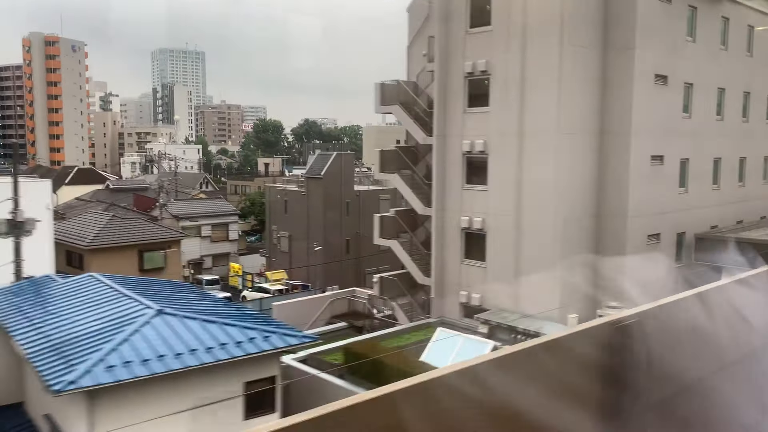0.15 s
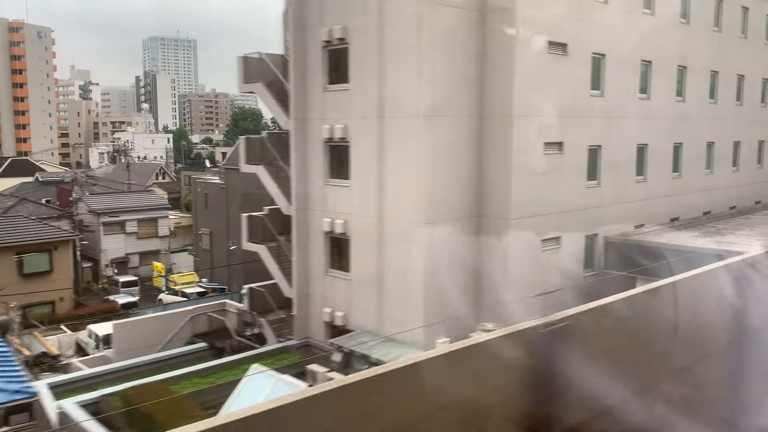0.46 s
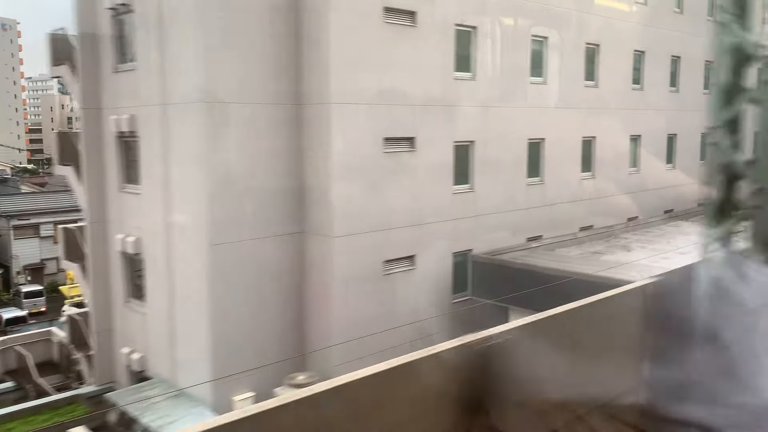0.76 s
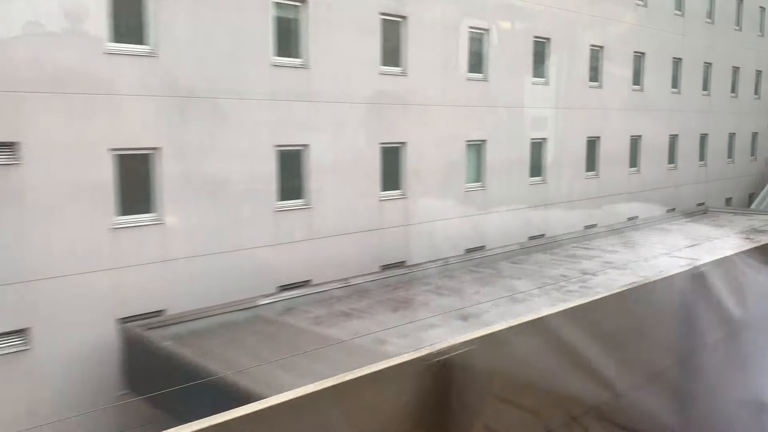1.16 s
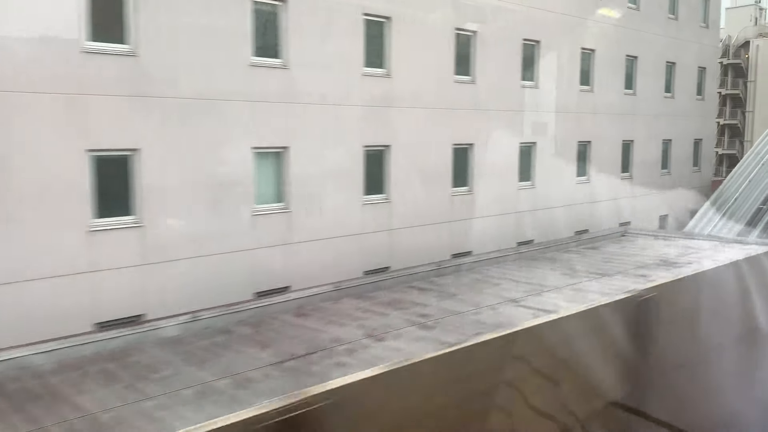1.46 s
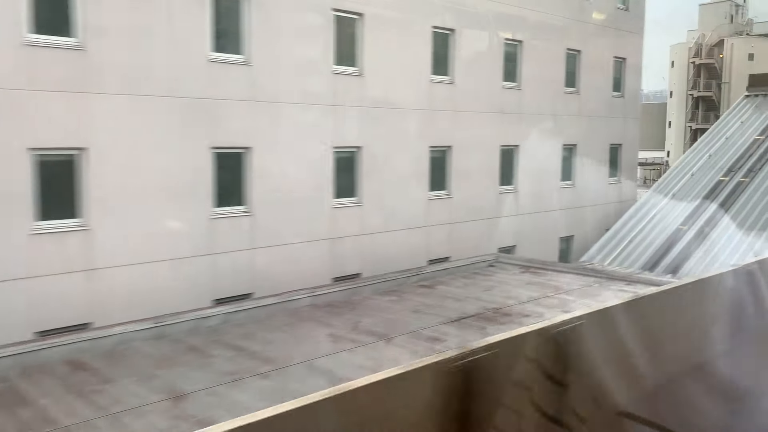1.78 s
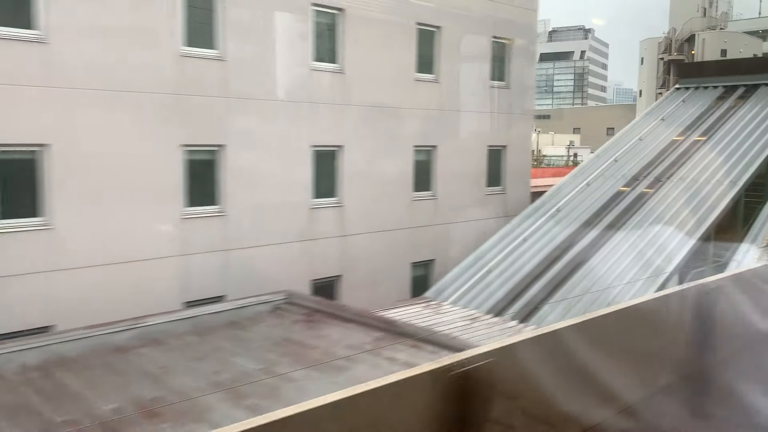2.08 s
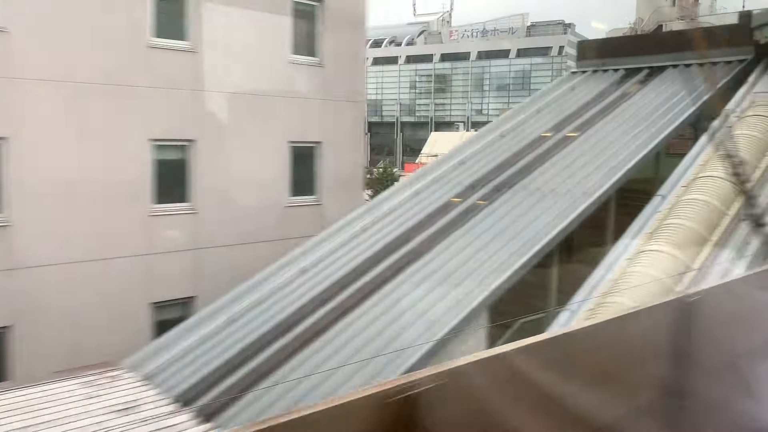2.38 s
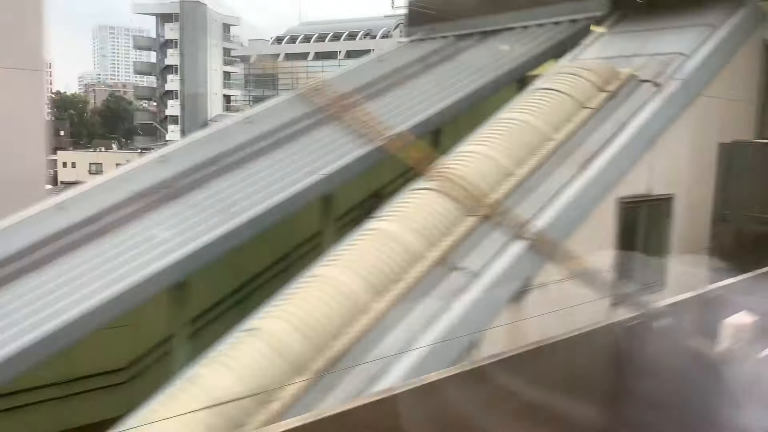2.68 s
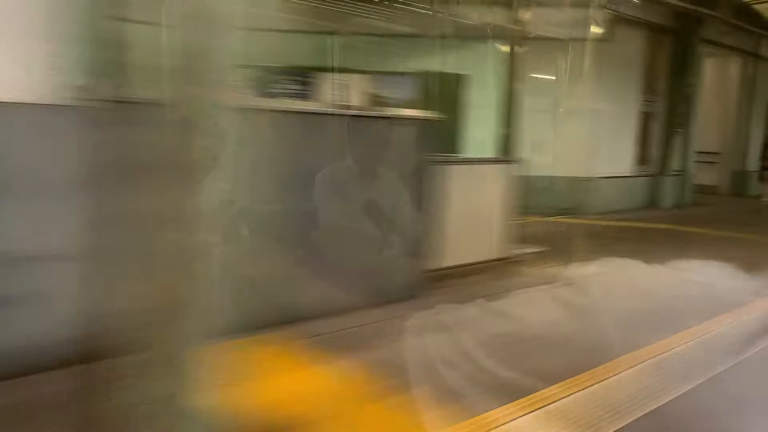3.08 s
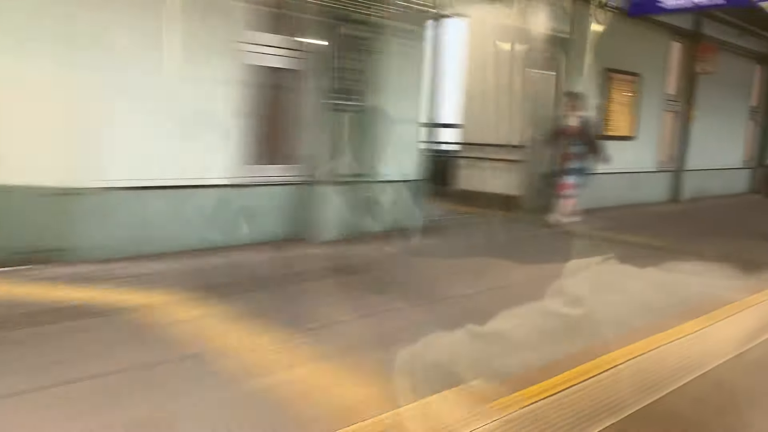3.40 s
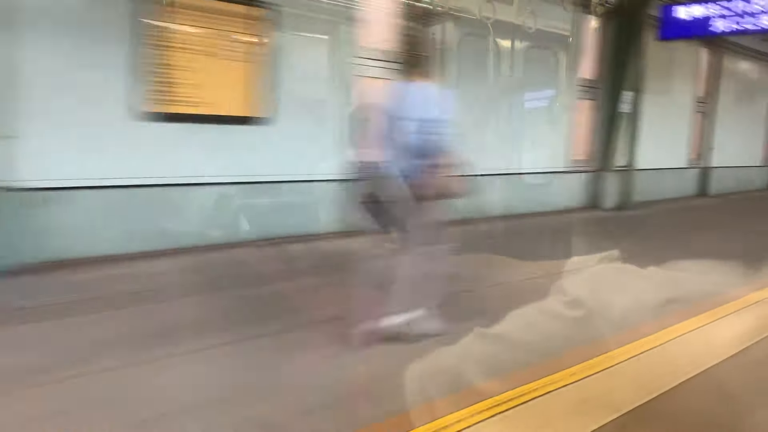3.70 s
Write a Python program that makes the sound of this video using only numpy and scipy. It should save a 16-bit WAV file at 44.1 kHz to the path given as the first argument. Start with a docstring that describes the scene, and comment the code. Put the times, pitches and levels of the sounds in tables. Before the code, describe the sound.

Low roaring train rumble with floor thuds and hollow knocks, heard from inside a moving carriage.

```python
"""A booming, roaring railway carriage rolls along a viaduct into a station: two spaced microphones at the window.
Boom, rumble, roar and treble are patchy noise lifted at the carriage's resonances, louder under the station roof.
Narrow hums, thuds, knocks and a faint wheel squeal come from below, as noise bands and wavering sines;
a tone stands across the carriage. Close by, cloth brushes in short strokes of hiss and a few small things
tick as decaying noise."""
import sys
import numpy as np
from scipy import signal
from scipy.fft import rfft, irfft, next_fast_len
from scipy.io import wavfile
from scipy.ndimage import uniform_filter1d, map_coordinates

SR = 44100
rng = np.random.default_rng(int(sys.argv[2]) if len(sys.argv) > 2 else 0)


def master_out(mix):
    """Clip the mix to full scale and print it as 16-bit PCM to the path in sys.argv[1]."""
    frames = np.transpose(np.atleast_2d(mix))
    ceiling = np.clip(frames, -1, 1)
    pcm = np.round(ceiling * 32767).astype(np.int16)
    wavfile.write(sys.argv[1], SR, pcm)


N = 169785

# Swell of the wheel noise before jolts: (time [s], roar [dB], treble [dB], rail hiss [dB])
ROAR_SWELL = [(0, -33.5, -39.5, -64), (.2, -36, -40.5, -63), (.45, -33.5, -38, -62), (.55, -31, -36, -61),
              (.68, -29.5, -33, -55), (.74, -35.5, -36.5, -55.5), (.85, -33.5, -38.5, -57),
              (.92, -31, -37.5, -57), (.97, -34.5, -39.5, -53), (1.15, -33, -38.5, -61),
              (1.42, -33.5, -40.5, -58), (1.8, -35, -38.5, -57.5), (2.1, -33, -38.5, -58.5),
              (2.4, -30.5, -38.5, -58), (2.8, -26.5, -37.5, -57.5), (3.15, -24, -35, -58),
              (3.45, -26, -36.5, -59), (3.83, -25, -34, -57)]
# Train sound at the spaced microphones: (frequency [Hz], likeness [0-1], lead of the right one [rad])
MICROPHONE_PAIR = [(30, .985, 0), (90, .98, 0), (200, .92, -.05), (330, .88, .2), (460, .5, 1.1),
                   (650, .45, 3), (900, .1, 3), (1800, .25, 1.5), (2400, .25, 3.3), (3000, .2, 4.7),
                   (4300, .3, 6.3), (5600, .3, 9.4), (7500, .7, 12.5), (9000, .7, 14)]


def amp(db):
    """Decibels to gain."""
    return 10 ** (np.asarray(db) / 20)


def unit(x):
    """Scaled to rms 1."""
    return x / np.sqrt(np.mean(x ** 2) + 1e-20)


def along(points, hz):
    """Each column after the frequency, read on a log frequency axis."""
    f, *cols = np.transpose(points)
    return [np.interp(np.log(hz + 1), np.log(f + 1), c) for c in cols]


def curves(rows):
    """One value per sample for each column after the time."""
    s, *cols = np.transpose(rows)
    return [np.interp(np.arange(N) / SR, s, c) for c in cols]


def wobble(rate):
    """A smooth random curve, rate knots a second."""
    knots = rng.standard_normal(int(N * rate / SR) + 4)
    return map_coordinates(knots, [np.arange(N) * rate / SR])


def filtered(x, response, mirror="even"):
    """x times a complex response of frequency; mirrored ends keep the edges smooth."""
    edge = SR // 8
    x = np.pad(x, [(0, 0)] * (x.ndim - 1) + [(edge, edge)], mode="reflect", reflect_type=mirror)
    m = next_fast_len(N + 2 * edge)
    spectrum = rfft(x, m) * response(np.fft.rfftfreq(m, 1 / SR))
    return irfft(spectrum, m)[..., edge:edge + N]


def spread(pair, gain, arrival):
    """Two unrelated signals made into left and right; arrival(hz) gives likeness and right's lead."""
    def mid_side_gain(hz):
        turn = np.arccos(np.clip(arrival(hz)[0], 0, 1)) / 2
        return gain(hz) * [np.cos(turn), np.sin(turn)]

    def lead(hz):
        return np.exp(.5j * np.outer([-1, 1], arrival(hz)[1]))

    mid, side = filtered(pair, mid_side_gain)
    return filtered(np.array([mid + side, mid - side]), lead)


def from_train(hz):
    """Likeness and lead of the train's sound at the two microphones."""
    return along(MICROPHONE_PAIR, hz)


def from_nearby(hz):
    """A close source reaches the left microphone a little later, in step at one frequency."""
    likeness, lag_s, in_step_hz = .87, 1.62e-4, 7450
    return likeness + 0 * hz, 2 * np.pi * lag_s * (hz - in_step_hz)


def peak(hz, centre_hz, width_hz):
    """Gain of one resonance."""
    return 1 / (1 + (2 * (hz - centre_hz) / width_hz) ** 2)


def resonant_noise(hz, width_hz):
    """Noise of rms 1 through one resonance, spread like the train's sound."""
    return unit(spread(rng.standard_normal((2, N)), lambda f: peak(f, hz, width_hz), from_train))


def patchy_noise(patchy_db):
    """Two noises sharing patches of random gain in time and frequency."""
    z = signal.stft(rng.standard_normal((2, N)), nperseg=512)[2]
    field = uniform_filter1d(rng.standard_normal(z.shape[1:]), 5, 0)
    field = uniform_filter1d(field, 12, 1)
    return signal.istft(z * amp(patchy_db * unit(field)), nperseg=512)[1][:, :N]


def through_carriage(colour, patchy_db):
    """Rolling noise of rms 1, lifted at the carriage's resonances."""
    # Resonances over the broad colour: (frequency [Hz], width [Hz], lift [dB])
    resonances = [(153, 12, 3), (303, 22, 4), (393, 16, 6), (700, 25, 6), (760, 30, 4), (1370, 50, 2),
                  (1950, 150, 2), (2750, 150, 2)]

    def gain(hz):
        lift = 1 + sum((amp(db) - 1) * peak(hz, centre, width) for centre, width, db in resonances)
        return amp(along(colour, hz)[0]) * lift
    return unit(spread(patchy_noise(patchy_db), gain, from_train))


def rolling():
    """Boom, rumble, roar, treble and rail hiss: coloured noises shaken a little by the same jolts."""
    # Swell of the body before jolts: (time [s], boom [dB], low rumble [dB])
    body_swell = [(0, -20, -37), (.3, -30, -29), (.6, -21.5, -34), (1, -25, -28), (1.3, -24.5, -34),
                  (1.6, -25.5, -31.5), (2, -26, -38), (2.3, -22.5, -33), (2.7, -30.5, -32),
                  (2.95, -23, -33), (3.4, -20, -28), (3.83, -37, -25)]
    # Broad colour of each layer: (frequency [Hz], relative density [dB per Hz])
    boom_colour = [(8, -40), (20, -5), (34, -5), (48, -2), (68, 0), (88, -4), (100, -12), (160, -40),
                   (300, -120)]
    low_colour = [(30, -120), (70, -36), (105, 2), (125, -1.5), (140, -3.5), (200, -12), (280, -47),
                  (600, -120)]
    roar_colour = [(50, -120), (130, -30.5), (200, 2), (300, -0.5), (350, -2.5), (500, 0), (640, -1),
                   (740, -6), (830, -9.5), (1100, -37.5), (2500, -120)]
    treble_colour = [(200, -120), (500, -53.5), (800, -4), (980, -2), (1250, -13), (1600, -16.5),
                     (2700, -20.5), (3400, -28.5), (4500, -48.5), (8000, -120)]
    hiss_colour = [(1200, -120), (2600, -24.5), (3500, 1.5), (4400, 2.5), (5600, -4.5), (8300, -9),
                   (9300, -23), (12000, -64.5), (16000, -120)]
    jolt = wobble(8.25)
    boom_db, low_db = curves(body_swell)
    roar_db, treble_db, hiss_db = curves(ROAR_SWELL)
    # the factor on jolt is each layer's shake in dB
    return (amp(boom_db + 0.91 * jolt) * through_carriage(boom_colour, patchy_db=-1.0)
            + amp(low_db + 0.49 * jolt) * through_carriage(low_colour, patchy_db=-0.2)
            + amp(roar_db + 1.22 * jolt) * through_carriage(roar_colour, patchy_db=0.77)
            + amp(treble_db + 0.099 * jolt) * through_carriage(treble_colour, patchy_db=1.62)
            + amp(hiss_db + 0.49 * jolt) * through_carriage(hiss_colour, patchy_db=2.4))


def body_hum():
    """The body's low hum: one sine wavering in pitch and level."""
    # Hum before wavering: (time [s], pitch [Hz], level [dB])
    hum_course = [(0, 48, -30), (.3, 48, -27), (.7, 48.5, -23), (.9, 50, -27), (1.1, 48.5, -25),
                  (1.3, 49, -33), (1.6, 49, -26), (1.9, 49.5, -23), (2.2, 49, -26), (2.4, 49.5, -28),
                  (2.53, 48.6, -19), (2.75, 49, -29), (2.95, 48.5, -25), (3.15, 48.5, -28),
                  (3.35, 49.5, -22), (3.6, 49.5, -25), (3.83, 48, -32)]
    wavers_hz, wavers_db = .6, 1.5
    hz, db = curves(hum_course)
    level = amp(db + wavers_db * wobble(7.3))
    pitch_hz = hz + wavers_hz * wobble(9.6)
    return level * np.sin(2 * np.pi * np.cumsum(pitch_hz) / SR)


def cross_tone():
    """A tone standing across the carriage: narrow noise, opposite at the two microphones."""
    centre_hz, width_hz, level_db, wavers_db = 668, 22, -47.5, 2
    tone = unit(filtered(rng.standard_normal(N), lambda f: peak(f, centre_hz, width_hz)))
    return np.outer([1, -1], amp(level_db + wavers_db * wobble(4.9)) * tone)


def strands():
    """Narrow hums of wheels and motors: resonant noises that waver, most also following the roar."""
    # Hums: (frequency [Hz], width [Hz], level before swell [dB], share of the roar's swell followed [ratio])
    hum_lines = [(295.8, 39, -45, 1.46), (393.4, 14, -47, 1.1), (701.4, 15, -43.5, 1.25),
                 (757, 30, -54, 1.9), (1377, 82, -51.5, 0.16), (1964, 110, -58.5, 0),
                 (2840, 170, -68.5, .1)]
    wavers_db = 2
    roar_db = curves(ROAR_SWELL)[0]
    swell_db = roar_db - roar_db.mean()
    return sum(amp(db + share * swell_db + wavers_db * wobble(4.963)) * resonant_noise(hz, width_hz)
               for hz, width_hz, db, share in hum_lines)


def cloth():
    """Cloth brushing close by: a fine grainy hiss that swells and sinks with each stroke."""
    # Strokes: (middle [s], half length [s], level [dB])
    strokes = [(.03, .03, -67), (.37, .07, -66), (.67, .12, -51), (.9, .04, -63), (1.04, .09, -57),
               (1.14, .03, -61), (1.23, .03, -62), (1.38, .06, -64), (1.54, .05, -60), (1.76, .11, -52),
               (2.0, .05, -63), (2.13, .08, -55), (2.26, .04, -63), (2.56, .04, -64), (2.64, .015, -61),
               (2.75, .12, -68), (2.915, .02, -61), (3.38, .05, -65), (3.725, .03, -57)]
    # Colour of the hiss: (frequency [Hz], relative density [dB per Hz])
    cloth_colour = [(1500, -30), (3000, 0), (6000, -3), (9000, -3), (12000, -3), (15500, -8)]
    rest_db, patchy_db, grain_db = -72, .8, 1
    fall_db = 6  # drop at the half length
    t = np.arange(N) / SR
    power = sum(amp(db - fall_db * np.abs((t - s) / half) ** 2.2) ** 2 for s, half, db in strokes)
    fibres = patchy_noise(patchy_db) * amp(grain_db * (wobble(30) + wobble(400)))
    hiss = unit(spread(fibres, lambda hz: amp(along(cloth_colour, hz)[0]) * (hz > 1500), from_nearby))
    return np.sqrt(power + amp(rest_db) ** 2) * hiss


def thuds():
    """Low thuds through the floor: a few cycles of a sine, swelling and dying."""
    # Thuds: (middle [s], pitch [Hz], top of the swell [dB])
    floor_thuds = [(0.261, 71, -14.5), (0.452, 61, -23), (0.642, 53.6, -23.5), (.77, 56, -35),
                   (.89, 61, -15), (1.032, 56, -16), (1.149, 63, -21), (1.409, 57.5, -20),
                   (1.525, 62.6, -16.5), (1.679, 72, -19.5), (1.812, 66.4, -15.5), (1.901, 58, -14.5),
                   (2.023, 63, -15), (2.15, 53.5, -14.5), (2.36, 63, -14.5), (2.502, 52, -18.5),
                   (2.709, 55, -19.5), (2.922, 58, -16), (3.039, 55, -24), (3.258, 65, -15),
                   (3.439, 62, -12.5), (3.719, 60.6, -17)]
    half_s = 0.018
    t = np.arange(N) / SR
    total = np.zeros(N)
    for s, hz, db in floor_thuds:
        swell = np.exp(-((t - s) / half_s) ** 2 / 2)
        total += amp(db) * swell * np.cos(2 * np.pi * (hz * (t - s) + rng.random()))
    return total


def knocks():
    """Hollow knocks from below: soft bursts of rumble, each ringing one panel."""
    # Knocks: (start [s], pitch [Hz], width [Hz], level before rise and decay [dB])
    panel_knocks = [(.5, 420, 240, -23), (.54, 240, 130, -23), (.6, 370, 220, -23), (.67, 310, 140, -23),
                    (.79, 380, 180, -23), (.84, 320, 90, -25), (.89, 300, 110, -22), (1.11, 700, 120, -28),
                    (1.755, 500, 120, -24), (1.88, 480, 130, -26), (2.015, 510, 150, -23),
                    (2.1, 235, 70, -24), (2.55, 310, 70, -24), (2.84, 390, 60, -24), (3.2, 270, 70, -22),
                    (3.3, 520, 90, -26), (3.58, 520, 250, -25), (3.68, 560, 250, -25), (3.79, 190, 45, -22),
                    (3.79, 395, 60, -24)]
    rise_s, t60_s = .012, .25
    t, out = np.arange(N) / SR, np.zeros((2, N))
    for s, hz, width_hz, db in panel_knocks:
        since = np.maximum(t - s, 0)
        rise = 1 - np.exp(-since / rise_s)  # silent until the knock starts
        out += amp(db - 60 * since / t60_s) * rise * resonant_noise(hz, width_hz)
    return out


def ticks():
    """Small things close by: short dry cracks of noise, each with a duller body and a faint tail."""
    # Ticks: (start [s], level before colouring [dB], body over the crack before colouring [dB])
    small_ticks = [(0.9654, -34, 12.5), (1.0777, -43.5, -20), (1.5106, -60, 6), (1.7032, -51, -5),
                   (2.1852, -55.5, 2), (2.633, -50.5, -7), (2.9032, -54.5, 5), (3.715, -52, 3)]
    # Colours of crack and body: (frequency [Hz], gain [dB])
    crack_colour = [(2500, -71.5), (4500, -38), (6500, -6), (8500, 7), (12000, -14), (14500, 0),
                    (15700, -20.5)]
    body_colour = [(600, -60), (1200, -20), (2500, -11), (3400, -3), (4300, 4), (5200, 2), (6000, -18),
                   (9000, -60)]
    t60_s, tail_t60_s, tail_db = .026, .09, -20
    t = np.arange(SR // 8) / SR
    crack, body = np.zeros((2, N + SR)), np.zeros((2, N + SR))
    snap = 4 * (t == 0)  # first contact, over the rattle
    shape = amp(-60 * t / t60_s) + amp(tail_db - 60 * t / tail_t60_s)
    for s, db, body_db in small_ticks:
        start = round(s * SR)
        span = slice(start, start + len(t))
        crack[:, span] += amp(db) * shape * rng.standard_normal((2, len(t)))
        body[:, span] += amp(db + body_db) * (shape * rng.standard_normal((2, len(t))) + snap)
    return (spread(crack[:, :N], lambda hz: amp(along(crack_colour, hz)[0]), from_nearby)
            + spread(body[:, :N], lambda hz: amp(along(body_colour, hz)[0]), from_nearby))


def squeal():
    """A faint wheel squeal: unsteady sines that swell once, sagging in pitch as the train slows."""
    # Tones of the squeal: (pitch at the middle [Hz], relative level [dB])
    squeal_lines = [(4130, 0), (3450, -2), (4520, -6), (3290, -5), (4900, -10)]
    middle_s, half_s, level_db = 2.33, .19, -59.5
    sag_per_s, wavers_hz, wavers_db = .06, 50, 2  # sag as a share of the pitch
    u = np.arange(N) / SR - middle_s
    ring = np.zeros(N)
    for hz, db in squeal_lines:
        level = amp(db + wavers_db * wobble(23))
        pitch_hz = hz * (1 - sag_per_s * u) + wavers_hz * wobble(300)
        ring += level * np.sin(2 * np.pi * np.cumsum(pitch_hz) / SR)
    return amp(level_db - 6 * (u / half_s) ** 4) * ring


def scene():
    """The train's sounds lean left or right by band; squeal, cloth and ticks are added without that lean."""
    # Balance of the train: (frequency [Hz], left over right [dB])
    lean = [(60, -1), (110, -3), (200, -0.5), (380, 3.5), (700, 2.5), (1290, 0), (2380, 1), (4400, -1),
            (8120, -1), (15000, 1)]
    train = rolling() + body_hum() + cross_tone() + strands() + thuds() + knocks()
    train = filtered(train, lambda hz: amp(np.outer([.5, -.5], along(lean, hz)[0])), mirror="odd")
    return train + cloth() + ticks() + squeal()


def record(dry):
    """Nothing is kept above the band limit."""
    top_hz = 15750
    return filtered(dry, lambda hz: hz < top_hz, mirror="odd")


dry = scene()
out = record(dry)
master_out(out)
```